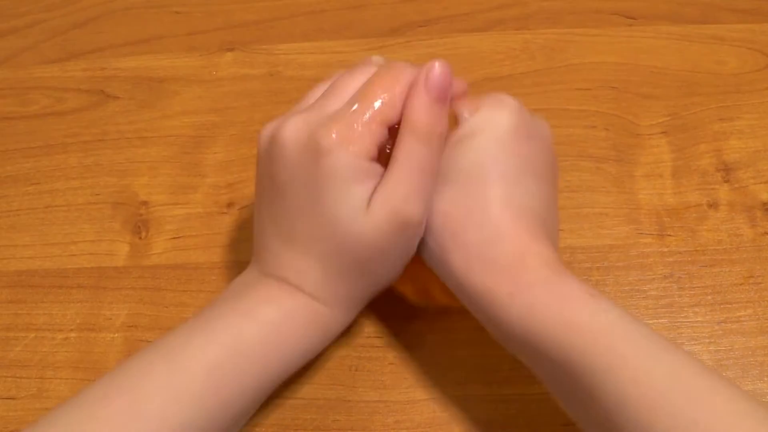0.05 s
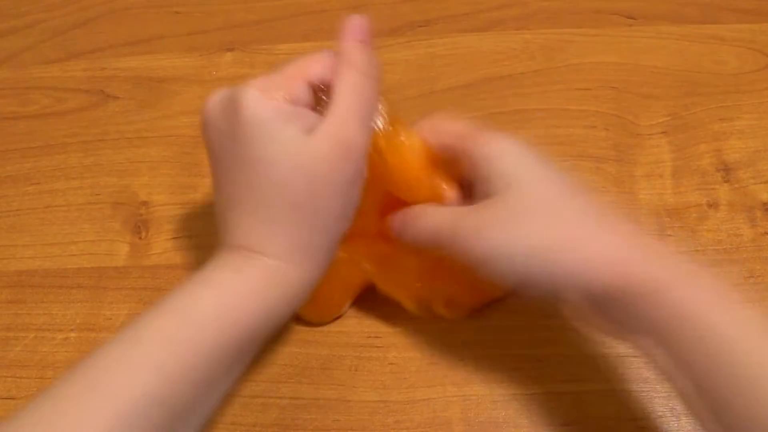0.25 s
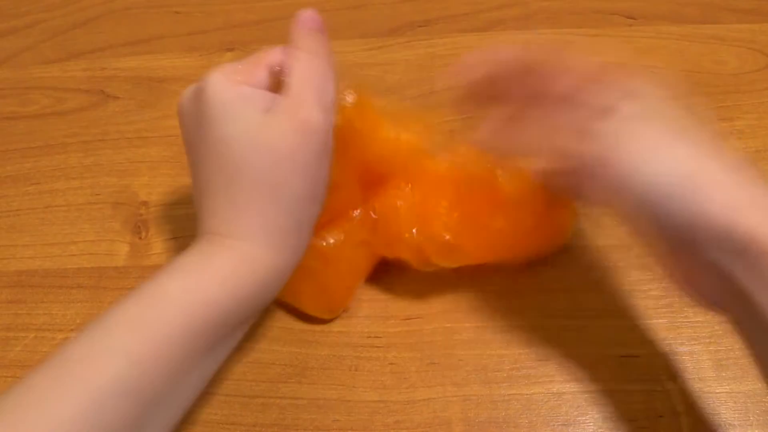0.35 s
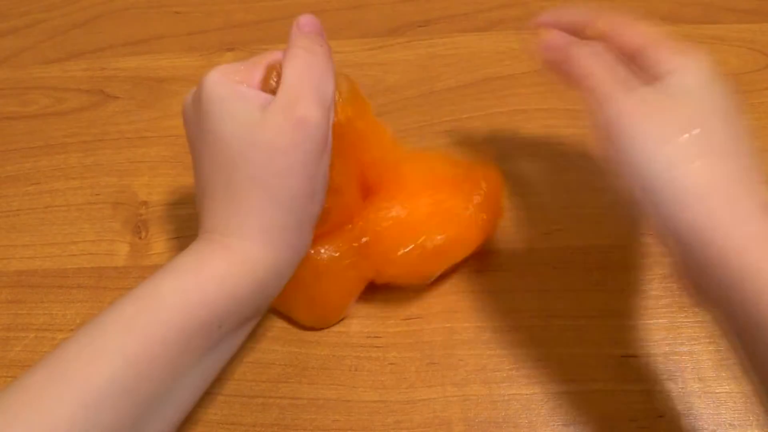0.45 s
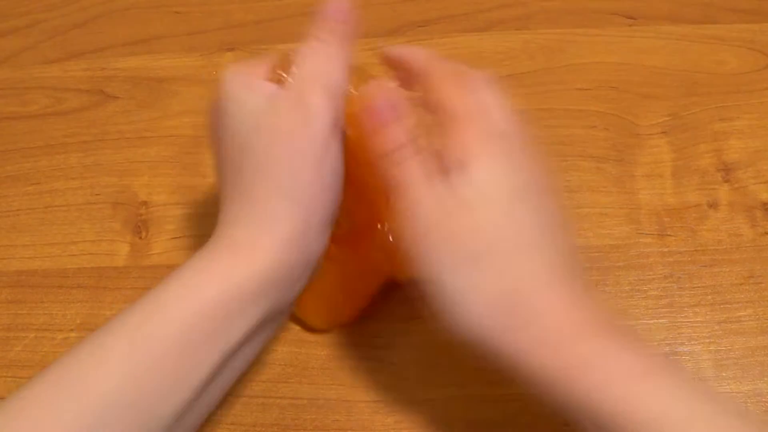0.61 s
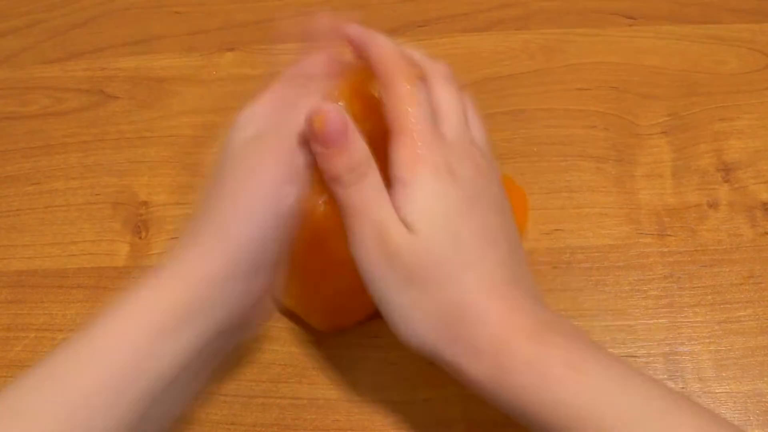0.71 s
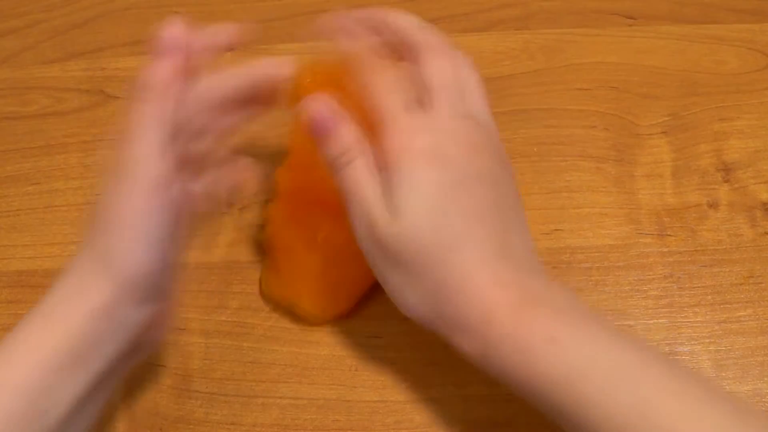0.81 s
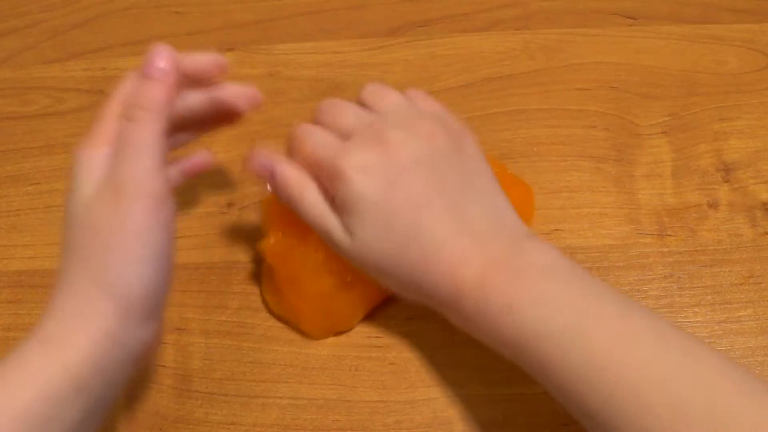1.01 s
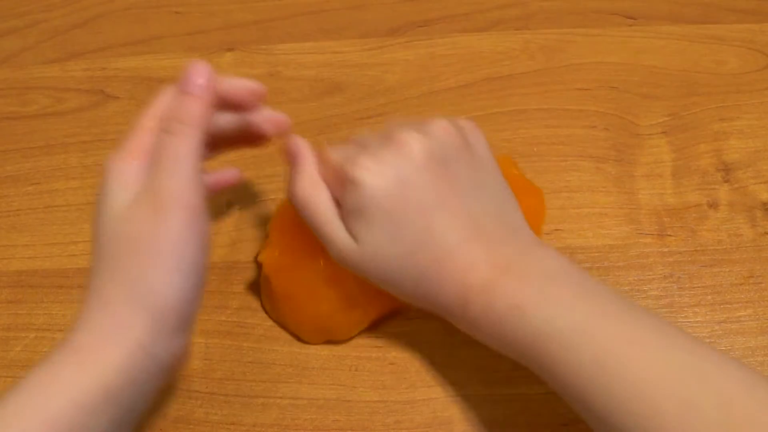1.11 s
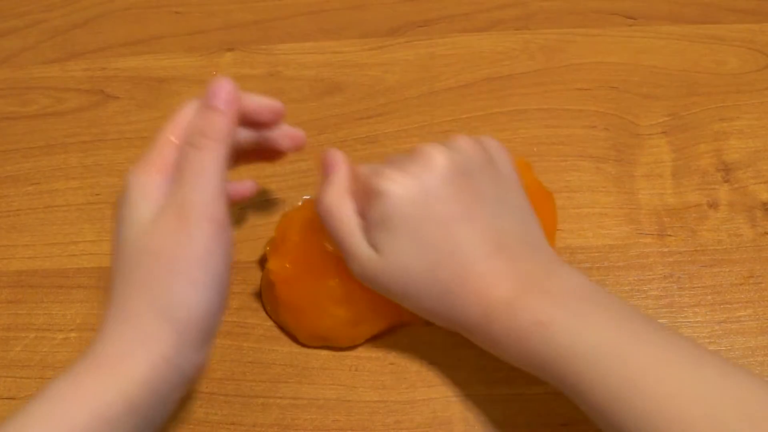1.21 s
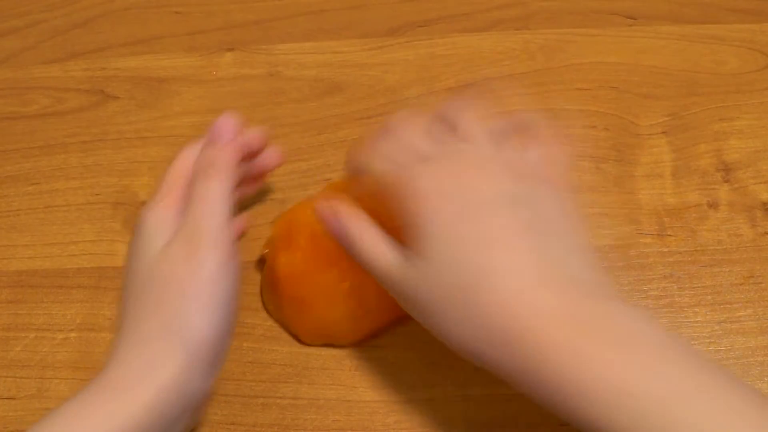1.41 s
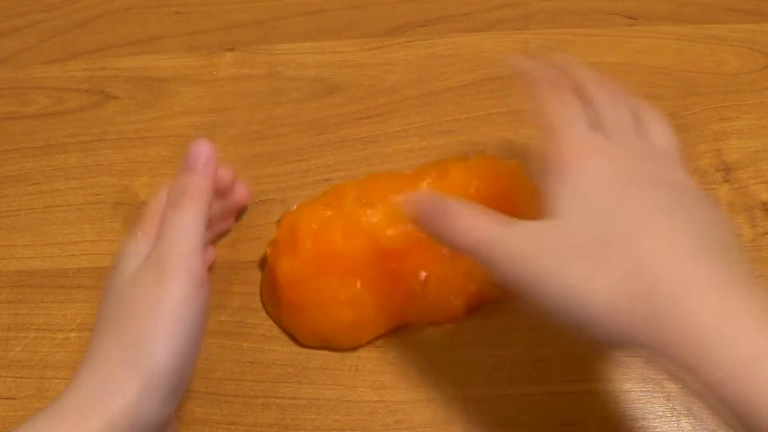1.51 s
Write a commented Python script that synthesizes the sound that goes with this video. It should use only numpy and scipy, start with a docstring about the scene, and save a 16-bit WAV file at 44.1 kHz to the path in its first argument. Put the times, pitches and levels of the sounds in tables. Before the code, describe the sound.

Slime crackles and pops wetly as hands squeeze it on a wooden table. A dense cluster of clicks ends in a brief hiss of air; after a short lull, more pops follow. Close microphone, small hard room.

```python
"""Sticky crackle and short wet pops, over a faint background, as hands squeeze, press and peel soft slime
on a wooden table. Tearing threads make the crackle, bursting air pockets make the pops, and larger
pockets collapse with soft squelches. Once, trapped air squirts out and hisses away. A nearby surface
repeats each pop a few milliseconds later, and the small hard room rings on."""
import sys
import numpy as np
from scipy import signal
from scipy.fft import rfft, irfft, next_fast_len
from scipy.io import wavfile
from scipy.ndimage import uniform_filter1d

SR = 44100
rng = np.random.default_rng(int(sys.argv[2]) if len(sys.argv) > 2 else 0)


def pcm_store(signal):
    """Save signal as 16-bit PCM."""
    levels = np.round(np.clip(np.atleast_2d(signal), -1, 1) * 32767)
    wavfile.write(sys.argv[1], SR, levels.astype(np.int16).T)


N = 68355

# How loudly the threads tear: (time [s], fine threads [dB], thick threads [dB])
CRACKLE_LEVELS = [(0, -70.5, -57), (.018, -76, -81), (.16, -80, -88), (.178, -64.5, -74.5),
                  (.225, -64, -65.5), (.245, -58.5, -54.5), (.28, -65, -64.5), (.31, -54.5, -46.5),
                  (.37, -61, -64.5), (.42, -52.5, -56), (.48, -59.5, -59), (.58, -50, -65),
                  (.72, -93, -83.5), (.747, -60, -62.5), (.80, -69.5, -66.5), (.87, -63.5, -67.5),
                  (.90, -85.5, -85), (1.09, -85, -85.5), (1.13, -81, -71.5), (1.168, -71.5, -72),
                  (1.175, -63, -67.5), (1.205, -67, -63), (1.26, -64.5, -66.5), (1.33, -76, -70),
                  (1.427, -89, -72.5), (1.438, -67.5, -56.5), (1.50, -59.5, -60), (1.52, -71, -83),
                  (1.55, -92, -89)]
# Typical pitch of the thick threads: (time [s], pitch [Hz])
THICK_PITCH = [(.2, 1850), (.32, 3220), (.5, 1556), (.76, 2990), (.83, 1730), (1.27, 1520), (1.44, 2755)]
# Tone of the steady background: (frequency [Hz], relative level [dB])
BACKGROUND_TONE = [(12, -38.5), (20, -6), (81, -7), (193, -12), (310, -9.5), (485, -7.5), (4940, -33),
                   (7950, -32), (16000, -41.5)]
# How alike it is in both ears: (frequency [Hz], likeness [1 = same, -1 or less = opposite])
BACKGROUND_LIKENESS = [(60, 0.67), (180, 0.66), (1000, -1.36), (4970, -0.68), (15000, 1)]
# Thuds and handling on the table: (time [s], level [dB])
RUMBLE_LEVELS = [(0, -96), (.03, -75.5), (.45, -81.5), (.5, -78), (.555, -64), (.7, -81), (1.34, -91.5),
                 (1.39, -74), (1.51, -62), (1.55, -74)]
# Bursting air pockets; the echo is weak where a hand shades the nearby surface:
# (time [s], pocket pitch [Hz], pocket level [dB], film pitch [Hz], film level [dB], echo gain [dB])
POCKET_POPS = [(.004, 2820, -45, 5450, -40.5, -13), (0.0314, 3890, -28.5, 9470, -33, -8),
               (0.1023, 2800, -51.5, 10850, -38, -8), (0.1768, 4058, -47.5, 13800, -30.5, -15),
               (0.2126, 2160, -35, 7460, -15.5, -30), (0.2343, 6760, -24, 9660, -28.5, -24),
               (0.2389, 2670, -30, 6900, -30, -21), (0.244, 1930, -34.5, 6380, -26.5, -12),
               (0.2948, 1700, -31.5, 9200, -47, -6), (0.306, 2674, -23.5, 7820, -22, -22),
               (0.3177, 3680, -64, 8200, -41, -18), (0.3685, 2840, -37, 8000, -36, -5),
               (0.379, 3060, -35, 12300, -22, -6), (0.386, 2940, -41, 7370, -16, -11),
               (0.4084, 2880, -50, 11000, -34, -16), (0.417, 3360, -25, 9860, -19.5, -9),
               (0.4194, 7470, -30, 10700, -29, -12), (0.4204, 7110, -21, 10500, -40, -7.5),
               (0.4541, 1890, -32, 5710, -25.5, -15), (0.5127, 1470, -32, 7100, -47, -6),
               (0.5186, 4040, -32, 8400, -18, -26), (0.5581, 7800, -20, 10350, -17, -4.5),
               (0.5758, 11900, -21, 14700, -26, -20), (.778, 13200, -46, 10200, -37, 2),
               (0.8, 2840, -43, 9800, -37, -23), (1.0424, 10700, -50.5, 15000, -48, -20),
               (1.1026, 6400, -50, 6570, -47, -17), (1.114, 1900, -50, 8520, -37.5, -14),
               (1.1338, 1990, -56.5, 7160, -48, -9), (1.1744, 5100, -32.5, 10800, -33, -9),
               (1.1753, 1900, -41, 14200, -27.5, -8), (1.197, 6240, -34, 8100, -36, -26),
               (1.1994, 2970, -33.5, 6950, -22, -30), (1.2002, 2540, -42, 12000, -28, -25),
               (1.2030, 5750, -15, 11040, -23.5, -20), (1.2373, 8000, -40, 13200, -38, -24),
               (1.2464, 8080, -26.5, 12800, -32.5, -11), (1.2692, 1460, -41.5, 7750, -62, -1),
               (1.2855, 9330, -34, 12860, -45.5, -9), (1.3311, 3240, -45, 10100, -48.5, -8),
               (1.3676, 2780, -42.5, 9900, -49.5, -7), (1.4571, 2750, -35, 7500, -35, -33),
               (1.4968, 3860, -39, 10100, -31.5, -15)]
# Larger pockets collapsing: (time [s], starting pitch [Hz], level [dB], time to fade 60 dB [s])
POCKET_SQUELCHES = [(.0310, 1270, -24.5, 0.0026), (0.031, 644, -41, 0.007), (.2130, 520, -40, 0.0064),
                    (.2440, 550, -37, 0.0077), (0.2925, 1537, -38.5, 0.021), (0.3065, 665, -24, 0.0071),
                    (0.3062, 3140, -23, 0.0074), (0.4225, 501, -35.5, 0.019), (.4224, 953, -25.5, 0.011),
                    (.858, 1605, -50, 0.034), (1.139, 312, -51, 0.032), (1.2010, 527, -36.5, 0.016),
                    (1.2280, 604, -50, 0.023), (1.4438, 2210, -36, 0.0078)]
# Tone of the squirting air: (frequency [Hz], relative level [dB])
JET_TONE = [(300, -52), (700, -39), (1500, -7.5), (2200, -19), (3300, -4.5), (3950, -1.5), (4280, 5),
            (4650, -13), (5700, -14.5), (7500, -2.5), (9000, -8.5), (13500, -7), (16000, -14)]
# Which side is louder: (frequency [Hz], left minus right [dB])
SIDE_BALANCE = [(60, -7), (380, -2.5), (2380, -2.5), (15000, 1)]
# How long the room rings: (frequency [Hz], time to fade 60 dB [s])
ROOM_FADE = [(200, 0.5), (1500, 0.49), (4000, 0.31), (9000, 0.16), (15000, 0.27)]
# Tone of that ringing: (frequency [Hz], relative level [dB])
ROOM_TONE = [(200, -0.5), (1000, -5.5), (4000, 1), (16000, -6.5)]
# How alike it is in both ears: (frequency [Hz], likeness [1 = same])
ROOM_LIKENESS = [(200, 0.76), (600, 1), (1600, .6), (5000, 0.69), (15000, 0.43)]
# What the microphones boost or soften: (frequency [Hz], gain [dB])
MIC_TONE = [(2000, 0), (4200, 1.5), (5400, -2.5), (7500, 2.5), (12000, 1.5), (16000, 2.5)]


def amp(db):
    return 10 ** (np.asarray(db) / 20)


def unit_level(x):
    return x / np.sqrt(np.mean(x ** 2) + 1e-20)


def look_up(table, hz):
    """Read between a table's rows on a logarithmic frequency scale."""
    table_hz, values = np.transpose(table)
    return np.interp(np.log(hz + 1), np.log(table_hz + 1), values)


def curves(table):
    """One value per sample for each column after the time."""
    times, *columns = np.transpose(table)
    return [np.interp(np.arange(N) / SR, times, column) for column in columns]


def filtered(x, response):
    """Multiply each frequency in x by response(hz)."""
    size = next_fast_len(N + SR // 2)
    return irfft(rfft(x, size) * response(np.fft.rfftfreq(size, 1 / SR)), size)[..., :N]


def stereo(pair, likeness):
    """Blend two unrelated signals into a left and right of the given likeness."""
    angle = lambda hz: np.arccos(np.clip(look_up(likeness, hz), -1, 1)) / 2
    mid, side = filtered(pair, lambda hz: np.array([np.cos(angle(hz)), np.sin(angle(hz))]))
    return np.array([mid + side, mid - side])


def place(start_s, waves):
    """Add up short waves, one per row, each at its own time."""
    at = np.round(start_s * SR).astype(int)[:, None] + np.arange(waves.shape[1])
    return np.bincount(at.ravel(), waves.ravel(), N + SR)[:N]


def rings(hz, db, fade_s, samples=512, attack_s=.0001, rise=0):
    """Short notes, one per row, that first pull inward and fade 60 dB in fade_s."""
    t = np.arange(samples) / SR
    hz, db, fade_s = hz[:, None], db[:, None], fade_s[:, None]
    loudness = amp(db - 60 * t / fade_s) * (1 - np.exp(-t / attack_s))
    return -loudness * np.sin(2 * np.pi * hz * t * (1 + rise * t / fade_s))


def thread_snaps(count, hz, pitch_spread, spread_db=2.5, fade_cycles=14):
    """Threads of many sizes snap at random times, each near the pitch hz holds at that moment."""
    when = rng.random(count) * N
    pitch_draw, level_draw = rng.standard_normal((count, 2)).T
    pitch = np.clip(hz[when.astype(int)] * np.exp(pitch_spread * pitch_draw), 300, SR / 2.6)
    snaps = rings(pitch, spread_db * level_draw, fade_cycles / pitch, samples=400)
    return unit_level(place(when / SR, snaps))


def crackle():
    """Fine and thick sticky threads tear while the hands move."""
    fine_db, thick_db = curves(CRACKLE_LEVELS)
    fine = thread_snaps(count=9000, hz=np.full(N, 10160), pitch_spread=.411)
    thick = thread_snaps(count=3500, hz=curves(THICK_PITCH)[0], pitch_spread=.511)
    return amp(fine_db) * fine + amp(thick_db) * thick


def background(level_db=-76.5):
    """The faint, steady noise of the room."""
    noise = filtered(rng.standard_normal((2, N)), lambda hz: amp(look_up(BACKGROUND_TONE, hz)))
    tone = stereo(noise, BACKGROUND_LIKENESS)
    return amp(level_db) * tone / np.sqrt(np.mean(tone.mean(axis=0) ** 2))


def table_rumble(top_hz=56):
    """Thuds and handling send a low rumble through the table."""
    low = filtered(rng.standard_normal(N), lambda hz: (hz > 15) / (1 + (hz / top_hz) ** 4))
    return amp(curves(RUMBLE_LEVELS)[0]) * unit_level(low)


def pops(pocket_cycles=10, film_cycles=13, tear_hz=13400, tear_db=-12, spatter_db=-12, spatter_s=.008):
    """A pocket's film tears and snaps, and its air rings. Returns the pops and the share that echoes."""
    times, pocket_hz, pocket_db, film_hz, film_db, echo_db = np.transpose(POCKET_POPS)
    tear = rings(np.full(len(times), tear_hz), film_db + tear_db, film_cycles / 2 / film_hz)
    film = rings(film_hz, film_db, film_cycles / film_hz)
    pocket = rings(pocket_hz, pocket_db, pocket_cycles / pocket_hz, attack_s=.00013)
    # Smoothed noise times a note gives a wet spatter around that pitch.
    noise = uniform_filter1d(rng.standard_normal((2, len(times), 512)), size=6, axis=2) * np.sqrt(6)
    fade_s = np.full(len(times), spatter_s)
    spatter = noise[0] * rings(pocket_hz, pocket_db + spatter_db, fade_s)
    spatter += noise[1] * rings(film_hz, film_db + spatter_db, fade_s)
    pop = tear + film + pocket + spatter
    return place(times, pop), place(times, amp(echo_db)[:, None] * pop)


def squelches():
    """Larger pockets collapse with a soft low note that climbs."""
    times, hz, db, fade_s = np.transpose(POCKET_SQUELCHES)
    return place(times, rings(hz, db, fade_s, samples=2048, attack_s=.0005, rise=.29))


def squirt(start_s=.4948, level_db=-36, open_s=.00061, hold_s=.0027, burst_fade_s=.018, split_hz=10200):
    """Trapped air bursts through a slit, then hisses away; the highest part dies first."""
    t = np.arange(N) / SR - start_s
    opening = np.clip(t / open_s, 0, 1)
    burst = amp(-60 * np.clip(t - hold_s, 0, 1) / burst_fade_s)
    loudness = lambda fade_s: opening * (burst + amp(-2 - 60 * np.clip(t, 0, 2) / fade_s))
    jet = unit_level(filtered(rng.standard_normal(N), lambda hz: amp(look_up(JET_TONE, hz))))
    body = filtered(jet, lambda hz: 1 / (1 + (hz / split_hz) ** 6))
    top = jet - body
    return amp(level_db) * (loudness(fade_s=.43) * body + loudness(fade_s=.25) * top)


def surface_echo(x, delay_s=.0037, skew_s=.00005, centre_hz=8200, width_hz=27000):
    """A nearby surface bounces the treble back, a little earlier on the right."""
    late_s = delay_s + skew_s * np.array([[1], [-1]])
    treble = lambda hz: 1j * hz * width_hz / (centre_hz ** 2 - hz ** 2 + 1j * hz * width_hz)
    return filtered(x, lambda hz: np.exp(-2j * np.pi * hz * late_s) * treble(hz))


def room_ring(x, level_db=-8, gap_s=.006):
    """The hard room rings on, each frequency dying at its own speed."""
    hz, t, noise = signal.stft(rng.standard_normal((2, SR // 2)), SR, nperseg=256)
    tail_db = look_up(ROOM_TONE, hz)[:, None] - 60 * t / look_up(ROOM_FADE, hz)[:, None]
    tail = signal.istft(noise * amp(tail_db), SR, nperseg=256)[1]
    delayed = np.pad(x, (round(gap_s * SR), 0))[None]
    ringing = signal.fftconvolve(delayed, tail / np.linalg.norm(tail[0]), axes=1)[:, :N]
    return amp(level_db) * stereo(ringing, ROOM_LIKENESS)


def scene(bass_cut_hz=226, pop_to_room_db=-6):
    """The slime sits close to the microphones, a little to the right."""
    popping, toward_surface = pops()
    rest = squelches() + crackle() + squirt()
    # Small pockets give off no bass.
    popping, rest = filtered(np.array([popping, rest]), lambda hz: (1j * hz / (bass_cut_hz + 1j * hz)) ** 2)
    balance = lambda hz: amp(look_up(SIDE_BALANCE, hz) * np.array([[.5], [-.5]]))
    near = filtered(popping + rest + surface_echo(toward_surface), balance)
    # Pops aim upward and feed the room less than the rest.
    room = room_ring(amp(pop_to_room_db) * popping + rest)
    return near + room + background() + table_rumble()


def record(dry, top_hz=15900):
    """The microphones colour the sound, and the very highest treble is cut off."""
    coloured = filtered(dry, lambda hz: amp(look_up(MIC_TONE, hz)))
    return filtered(coloured, lambda hz: 1 / (1 + (hz / top_hz) ** 100))


dry = scene()
out = record(dry)
pcm_store(out)
```